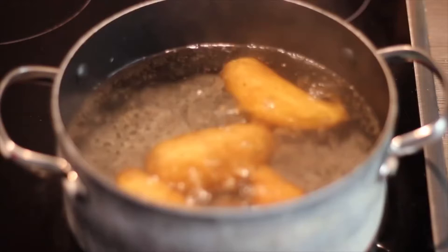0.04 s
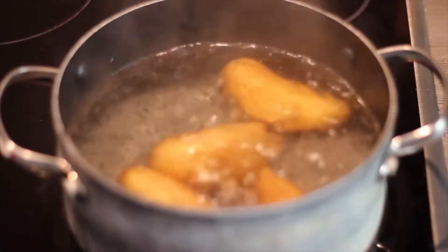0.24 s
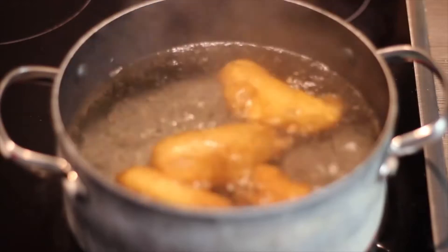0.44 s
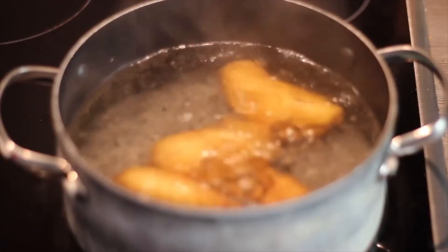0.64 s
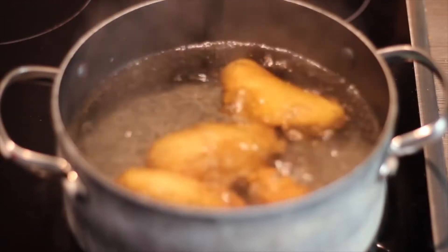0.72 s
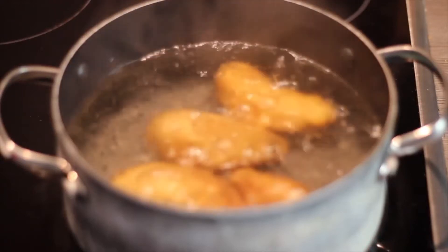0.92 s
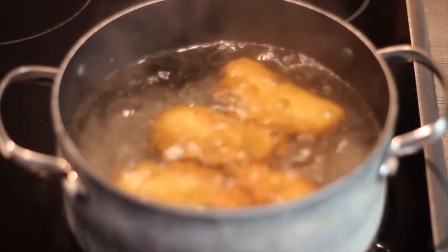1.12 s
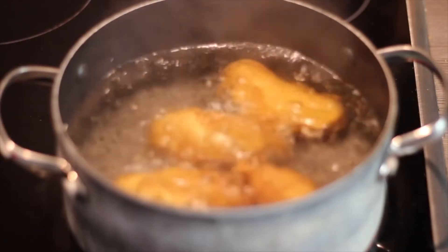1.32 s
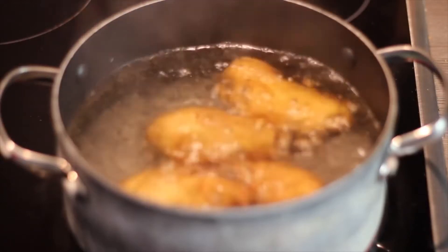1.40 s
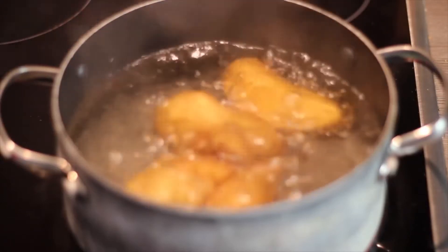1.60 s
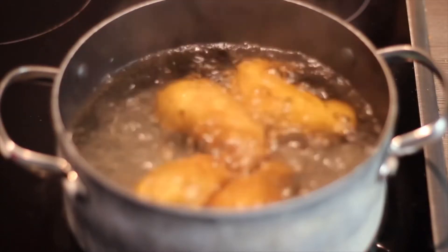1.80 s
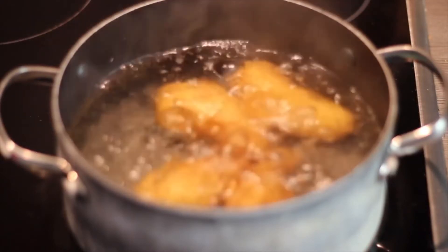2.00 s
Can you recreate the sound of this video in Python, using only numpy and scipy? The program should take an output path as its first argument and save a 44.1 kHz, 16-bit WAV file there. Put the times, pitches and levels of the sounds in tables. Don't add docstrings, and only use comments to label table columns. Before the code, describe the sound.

Water boils hard in a steel pan, big bubbles gulping and popping amid spitting droplets

```python
import sys
import numpy as np
from scipy import signal
from scipy.fft import rfft, irfft, next_fast_len
from scipy.io import wavfile
from scipy.ndimage import uniform_filter1d, map_coordinates

SR = 44100
rng = np.random.default_rng(int(sys.argv[2]) if len(sys.argv) > 2 else 0)


def log_audio(samples):
    frames = np.atleast_2d(samples).T
    limited = np.clip(frames, -1, 1)
    pcm = np.round(limited * 32767).astype(np.int16)
    wavfile.write(sys.argv[1], SR, pcm)


def volts_from_decibels(level):
    exponent = np.asarray(level, float) / 20
    return 10 ** exponent


N = 90537
START_S = .188


def unit(x):
    return x / np.sqrt(np.mean(x ** 2) + 1e-20)


def along(points, hz):
    point_hz, value = np.transpose(points)
    return np.interp(np.log(hz + 1), np.log(point_hz + 1), value)


def wobble(rate_hz):
    knots = rng.standard_normal(int(N * rate_hz / SR) + 4)
    return map_coordinates(knots, [np.arange(N) * rate_hz / SR])


def filtered(x, response):
    size = next_fast_len(N + SR // 2)
    return irfft(rfft(x, size) * response(np.fft.rfftfreq(size, 1 / SR)), size)[..., :N]


def add(bus, start_s, sound, side):
    part = bus[:, max(round(start_s * SR), 0):][:, :len(sound)]
    part += np.outer([1, side], sound[:part.shape[1]])


def kitchen(x):
    # frequency in Hz, t60 in s.
    decay = [(300, .1), (10000, .06)]
    hz, t, z = signal.stft(rng.standard_normal((2, SR // 4)), SR, nperseg=256)
    fall = volts_from_decibels(-60 * t / along(decay, hz)[:, None])
    tail = signal.istft(z * fall, SR, nperseg=256)[1]
    return signal.fftconvolve(x[None], tail / np.linalg.norm(tail[0]), axes=1)[:, :N]


def steam_noise(boil, spectrum, level_db, follows, lag_s):
    z = signal.stft(rng.standard_normal((2, N)), nperseg=256)[2]
    field = uniform_filter1d(rng.standard_normal(z.shape[1:]), size=8, axis=0)
    field = uniform_filter1d(field, size=5, axis=1)
    patchy_db = 4.5 * unit(field)
    noise = signal.istft(z * volts_from_decibels(patchy_db), nperseg=256)[1][:, :N]
    pair = noise[0] * np.array([np.ones(N), unit(wobble(25))])
    coloured = unit(filtered(pair, lambda hz: volts_from_decibels(along(spectrum, hz))))
    effort = np.abs(uniform_filter1d(unit(boil) ** 2, int(lag_s * SR))) + .003
    return volts_from_decibels(level_db) * coloured * unit(effort ** (follows / 2))


def simmer(boil):
    # frequency in Hz, density in dB per Hz.
    spectrum = [(20, -20), (80, -6), (250, -3), (1000, -5), (1600, -11), (2500, -24), (5000, -45)]
    return steam_noise(boil, spectrum, level_db=-43, follows=.42, lag_s=.016)


def fizz(spray):
    # frequency in Hz, density in dB per Hz.
    spectrum = [(900, -30), (2300, -1.5), (7000, -5), (12000, -15), (15500, -26)]
    crackle = unit(volts_from_decibels(4.5 * wobble(130)))
    return steam_noise(spray, spectrum, level_db=-57.5, follows=.3, lag_s=.03) * crackle


def bursts(table, t60_s, attack_s, climb, gain_db, puff_db):
    bus, t = np.zeros((2, N)), np.arange(SR // 8) / SR
    f = np.fft.rfftfreq(len(t), 1 / SR) + 1
    noises = rfft(rng.standard_normal((len(table), len(t))))
    sides = rng.uniform(-1, 1, len(table))
    for (s, db, hz), noise, side in zip(table, noises, sides):
        cycles = hz * (t + climb * np.minimum(t * t / t60_s, 2 * t))
        tone = np.sin(2 * np.pi * cycles) * volts_from_decibels(-60 * t / t60_s)
        band = np.exp(-(np.log(f / hz) / .58) ** 2)
        puff_t60_s = max(.025, 15 / hz)
        puff = unit(irfft(noise * band, len(t))) * volts_from_decibels(puff_db - 60 * t / puff_t60_s)
        sound = volts_from_decibels(db + gain_db) * (tone + puff) * (1 - np.exp(-t / attack_s))
        add(bus, s - attack_s, sound, side)
    return bus


def swarm(count, hz, spread, size_db, level_db):
    luck = rng.random((count, 2))
    start_s = START_S + luck[:, 0] * N / SR
    db = level_db - size_db * np.log(luck[:, 1] + 1e-3)
    pitch_hz = np.clip(hz * np.exp(spread * rng.standard_normal(count)), 100, SR / 3)
    return np.column_stack([start_s, db, pitch_hz])


def murmur():
    table = swarm(260, hz=650, spread=.5, size_db=3.5, level_db=-41)
    return bursts(table, t60_s=.03, attack_s=.002, climb=.15, gain_db=.1, puff_db=-4)


def spit():
    table = swarm(450, hz=5000, spread=.6, size_db=3, level_db=-64)
    return bursts(table, t60_s=.014, attack_s=.0012, climb=.06, gain_db=.1, puff_db=-4)


def sprays():
    # time in s, peak in dB, lower band over upper in dB.
    throws = [(0.2648, -50, -5), (0.3691, -47, 0), (0.407, -42, -5), (0.4529, -37, -13), (0.5237, -51, -5),
              (0.5561, -45, -8), (0.5975, -45, 13), (0.6325, -44, 18), (0.6694, -35, -13),
              (0.7238, -36, -10), (0.7352, -35, -10), (0.7564, -48, -1), (0.7941, -33, -10),
              (0.8445, -36, -8), (0.8729, -38, -15), (0.9333, -47, -3), (0.9497, -43, 1), (0.9617, -41, 1),
              (1.044, -42, -14), (1.0515, -36, -15), (1.0584, -36, -14), (1.0929, -41, -9),
              (1.1233, -36, -6), (1.1328, -34, -6), (1.1732, -39, -3), (1.1944, -44, -9), (1.2665, -35, -2),
              (1.282, -30, -3), (1.3583, -42, -5), (1.3774, -42, -4), (1.4072, -34, -16),
              (1.4306, -40, -11), (1.4571, -37, -9), (1.4651, -39, -5), (1.5289, -32, -2),
              (1.6162, -39, -4), (1.6224, -34, -9), (1.6462, -32, -4), (1.6771, -36, 2), (1.6881, -24, -4),
              (1.737, -44, -2), (1.7843, -44, -8), (1.8178, -38, -9), (1.8811, -36, -11), (1.923, -36, -20),
              (2.0398, -34, -5)]
    # frequency in Hz, density in dB per Hz.
    high_band = [(5000, -25), (7500, -.5), (11000, -7.5), (15500, -24)]
    low_band = [(1000, -22), (2500, -.5), (6000, -2.5), (8000, -22)]
    rise_s, t60_s, wide = .0012, .019, .5
    bus, t = np.zeros((2, N)), np.arange(SR // 20) / SR
    f = np.fft.rfftfreq(len(t), 1 / SR)
    shape = (1 - np.exp(-(t / rise_s) ** 2)) * volts_from_decibels(-60 * t / t60_s)
    noises = rfft(rng.standard_normal((len(throws), 2, len(t))))
    for (s, db, low_db), noise in zip(throws, noises):
        high = unit(irfft(noise * volts_from_decibels(along(high_band, f)), len(t)))
        low = unit(irfft(noise * volts_from_decibels(along(low_band, f)), len(t)))
        mixed = high + volts_from_decibels(low_db + 4.5) * low
        hiss = volts_from_decibels(db - 5) * shape * mixed * [[1], [wide]]
        part = bus[:, round((s - rise_s) * SR):][:, :len(t)]
        part += hiss[:, :part.shape[1]]
    return bus


def ticks():
    # time in s, peak in dB, pitch in Hz.
    table = [(0.351, -40, 3600), (0.369, -40, 4300), (0.2643, -44, 6850), (0.3217, -38, 2610),
             (0.4529, -34, 3810), (0.521, -38, 2620), (0.5891, -34, 2980), (0.6325, -18, 4000),
             (0.6704, -31, 2660), (0.7243, -37, 2660), (0.7347, -31, 8360), (1.42, -31, 2250),
             (1.554, -28, 2450), (1.578, -36, 2000), (1.69, -30, 3200), (1.732, -30, 3100),
             (0.817, -36, 3110), (0.828, -29, 2640), (0.8454, -31, 5910), (0.9625, -32, 3060),
             (1.1328, -30, 4360), (1.1633, -31, 3120), (1.2665, -26, 6820), (1.2825, -23, 2640),
             (1.3129, -27, 4270), (1.3778, -32, 2950), (1.4576, -28, 3260), (1.5354, -27, 5450),
             (1.6167, -29, 2960), (1.6457, -30, 8210), (1.6766, -23, 6110), (1.6886, -20, 6050),
             (1.7754, -34, 3490), (1.966, -33, 2900)]
    return bursts(table, t60_s=.02, attack_s=.001, climb=.05, gain_db=-.5, puff_db=-11)


def pops():
    # time in s, peak in dB, pitch in Hz.
    table = [(0.6649, -21, 2310), (0.9625, -12, 1680), (1.2125, -20, 800), (1.267, -18, 2150),
             (1.2975, -10, 1360), (1.4062, -23, 1460), (1.5529, -26, 1230), (1.7394, -24, 1650),
             (.293, -24, 600), (.347, -32, 1900), (.351, -30, 1300), (.393, -28, 1150), (.854, -34, 1300),
             (1.2245, -24, 1900), (1.239, -24, 2300), (1.244, -21, 1750), (1.25, -24, 1950),
             (1.3772, -27, 1480), (1.4575, -25, 1700), (1.827, -31, 1410), (1.84, -16, 560),
             (2.017, -18, 900), (2.028, -26, 560)]
    return bursts(table, t60_s=.024, attack_s=.0012, climb=.1, gain_db=-.5, puff_db=-8)


def thumps():
    # time in s, peak in dB, pitch in Hz.
    table = [(0.204, -55, 231), (0.292, -29, 231), (0.394, -28, 299), (0.485, -30, 250), (0.554, -29, 242),
             (0.574, -29, 269), (0.647, -24, 296), (0.74, -25, 242), (0.793, -23, 234), (0.891, -20, 226),
             (0.947, -21, 248), (1.017, -31, 231), (1.043, -27, 245), (1.087, -15, 205), (1.213, -22, 264),
             (1.335, -21, 240), (1.362, -24, 226), (1.438, -21, 248), (1.567, -21, 223), (1.641, -28, 242),
             (1.664, -27, 229), (1.712, -14, 330), (1.805, -25, 231), (1.842, -14, 234), (1.999, -31, 275),
             (2.015, -26, 229)]
    return bursts(table, t60_s=.14, attack_s=.003, climb=.06, gain_db=2.5, puff_db=-8)


def risers(table, bend, top, start_db, end_db):
    bus, flutter, waver = np.zeros((2, N)), wobble(130), wobble(130)
    edge_s = .003
    for (s, end_s, low_hz, high_hz, db), luck in zip(table, rng.random((len(table), 3))):
        u = np.linspace(0, 1, round((end_s - s) * SR))
        at = (np.arange(len(u)) + int(luck[0] * N)) % N
        hz = (low_hz + (high_hz - low_hz) * u ** bend) * (1 + .026 * waver[at])
        rise_db = start_db * (1 - u / top) ** 2
        fall_db = end_db * ((u - top) / (1 - top)) ** 1.2
        swell_db = -np.where(u < top, rise_db, fall_db)
        to_edge_s = np.minimum(u, 1 - u) * (end_s - s)
        edge = np.sin(np.pi / 2 * np.clip(to_edge_s / edge_s, 0, 1))
        tone = np.sin(2 * np.pi * (np.cumsum(hz) / SR + luck[1]))
        add(bus, s, volts_from_decibels(db + swell_db + 1.6 * flutter[at]) * edge * tone, 2 * luck[2] - 1)
    return bus


def large_bubbles():
    # start in s, end in s, first Hz, last Hz, level in dB.
    hooked = [
        (.288, .336, 520, 1270, -29),
        (.965, 1.066, 310, 1081, -31),
        (1.085, 1.115, 1150, 1537, -33),
        (.95, .99, 660, 1540, -22),
        (1.71, 1.728, 500, 1620, -20),
        (1.87, 1.91, 660, 1500, -23),
        (1.98, 2.03, 480, 1000, -27),
        (.65, .772, 280, 1080, -24),
    ]
    late = [
        (.393, .496, 390, 1480, -24),
        (.465, .535, 490, 1420, -29),
        (.555, .596, 379, 1008, -25),
        (.592, .618, 345, 708, -19),
        (1.425, 1.514, 450, 1680, -21),
        (.362, .4, 870, 1170, -34),
    ]
    even = [(.19, .216, 740, 1219, -49), (.321, .342, 1420, 1430, -25), (1.155, 1.215, 400, 846, -23),
            (1.225, 1.253, 880, 930, -10.5), (1.45, 1.552, 215, 1030, -7.5), (1.6, 1.67, 249, 593, -39),
            (1.724, 1.746, 650, 1260, -10), (1.89, 1.936, 769, 1493, -18), (1.885, 1.925, 260, 360, -20),
            (1.905, 1.93, 330, 520, -27), (2.024, 2.055, 295, 285, -27), (2.037, 2.047, 1480, 1560, -19)]
    swelling = [
        (.862, .913, 330, 1330, -10),
        (.328, .364, 380, 930, -11),
        (.945, .969, 235, 275, -14),
        (1.283, 1.33, 1000, 1780, -23),
        (.222, .24, 2500, 3800, -56),
    ]
    fading = [(.613, .673, 720, 1250, -13), (.79, .815, 1050, 1000, -25), (.625, .645, 1200, 2100, -28),
              (1.33, 1.385, 870, 1184, -27), (1.737, 1.763, 1150, 1500, -14), (.318, .343, 340, 450, -15),
              (1.871, 1.9, 230, 290, -18), (1.724, 1.817, 330, 978, -14), (1.96, 1.981, 900, 1166, -28),
              (1.93, 1.97, 295, 400, -24), (1.929, 1.959, 540, 800, -14.5)]
    slowing = [
        (1.225, 1.322, 300, 800, -4),
    ]
    # bubbles, bend of the climb, loudest point 0-1, start and end in dB under peak.
    kinds = [(hooked, 1.6, .75, 3, 6), (late, 2.4, .85, 5, 3), (even, 1.01, .52, 12, 16),
             (swelling, 1.25, .7, 17, 15), (fading, 1.5, .12, 2.5, 15), (slowing, .45, .24, 11, 27)]
    rings = sum(risers(*kind) for kind in kinds)
    releases = [(s, db - start_db - 11, 1000)
                for table, _, _, start_db, _ in kinds for s, *_, db in table]
    splashes = bursts(releases, t60_s=.004, attack_s=.001, climb=.1, gain_db=.1, puff_db=2.5)
    return rings + splashes


def scene():
    fine = ticks() + sprays()
    placed = large_bubbles() + thumps() + pops() + fine
    beds = simmer(placed[0]) + fizz(fine[0] + .02 * placed[0])
    t = np.arange(N) / SR - START_S
    fade = volts_from_decibels(-29 * np.clip(1 - t / .12, 0, 1)) * (t > 0)
    chance = (spit() + murmur() + beds) * fade
    mid, side = placed + chance + volts_from_decibels(-18) * kitchen(placed[0] + chance[0])
    side = filtered(side * (t > 0), lambda f: 1j * (f / 8000) ** 1.15)
    return np.array([mid + side, mid - side]) * (t > 0)


def band_limit(x):
    return signal.sosfilt(signal.butter(12, 16640, fs=SR, output="sos"), x)


def record(dry):
    ceiling, top_hz = .95, 15850
    held = dry / (1 + np.abs(dry / ceiling) ** 6) ** (1 / 6)
    mix = filtered(held, lambda f: f < top_hz)
    return band_limit(mix)


dry = scene()
out = record(dry)
log_audio(out)
```